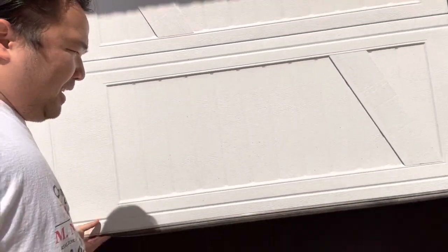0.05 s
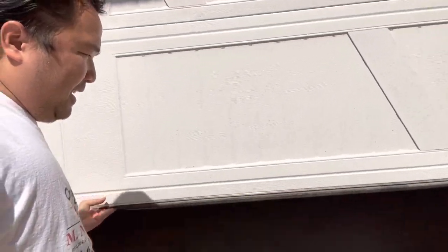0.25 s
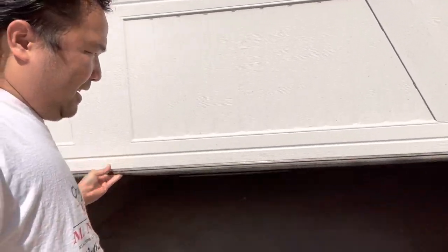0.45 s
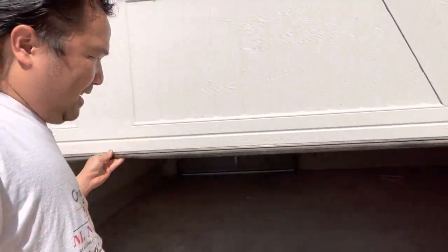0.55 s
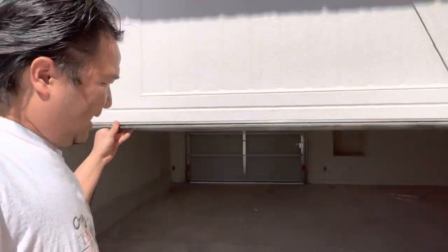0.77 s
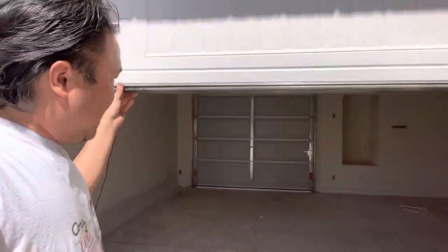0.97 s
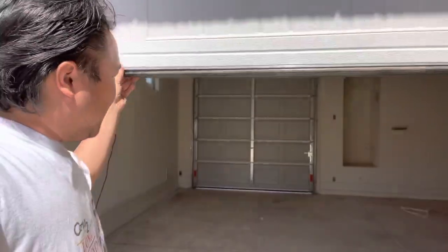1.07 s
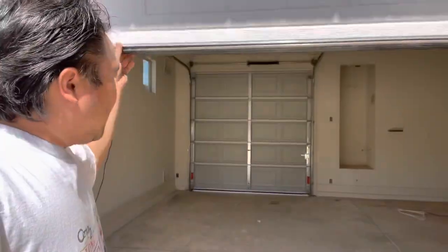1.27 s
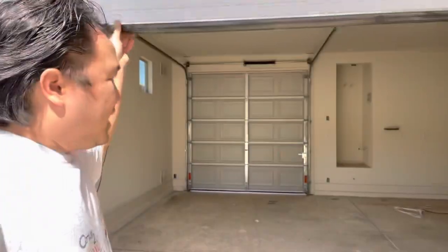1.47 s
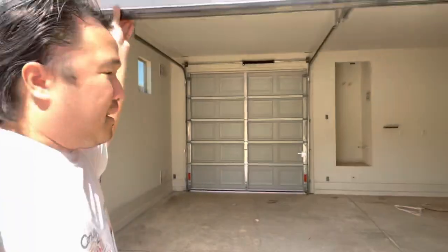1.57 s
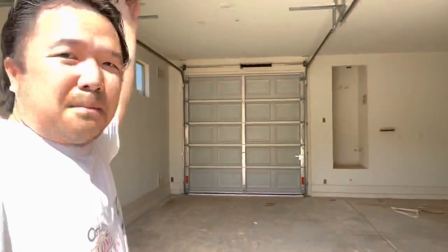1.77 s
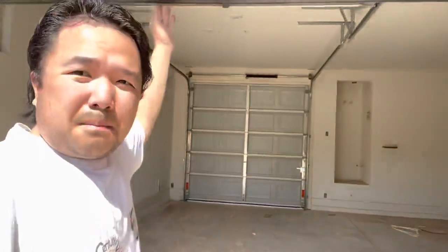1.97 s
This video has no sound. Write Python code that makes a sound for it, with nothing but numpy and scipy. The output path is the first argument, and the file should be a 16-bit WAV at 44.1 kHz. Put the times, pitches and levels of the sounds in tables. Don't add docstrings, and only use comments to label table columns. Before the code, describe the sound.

A sectional steel garage door rolls up its tracks for about two seconds, heard a metre away outside. Soft rumble and a bright metallic clack at 0.2 s lead into louder roller rattle from 0.3 s. A heavy knock lands near 0.67 s, a sharp clack at 1.04 s, and a cluster of clacks and thumps around 1.45-1.6 s. Rolling eases towards 2 s, over short empty-garage echo and faint street air.

```python
import sys
import numpy as np
from scipy import signal
from scipy.fft import rfft, irfft
from scipy.io import wavfile
from scipy.ndimage import uniform_filter1d

SR = 44100
rng = np.random.default_rng(int(sys.argv[2]) if len(sys.argv) > 2 else 0)


def persist_wave(psi):
    counts = np.round(np.clip(psi, -1, 1) * 32767).astype(np.int16)
    wavfile.write(sys.argv[1], SR, np.atleast_2d(counts).T)


def natural_amplitude(level_db):
    exponent = np.asarray(level_db, float) / 20
    return 10 ** exponent


N = 89214
FREQ = np.fft.rfftfreq(N, 1 / SR)
T = np.arange(N) / SR


def level(x, db):
    return x * natural_amplitude(db) / np.sqrt(np.mean(x ** 2))


def along(table, hz=FREQ):
    points = np.array(table)
    return np.interp(np.log(hz + 1), np.log(points[:, 0]), points[:, 1])


def colour(x, table):
    return irfft(rfft(x) * natural_amplitude(along(table)), N)


def ring(x, hz, t60):
    pole = np.exp(2j * np.pi * hz / SR - np.log(1000) / (t60 * SR))
    return signal.lfilter([1], [1, -pole], x).imag


def walk(rate):
    k = int(SR / rate)
    steps = np.repeat(rng.standard_normal((2, N // k + 1)), k, 1)
    smooth = uniform_filter1d(uniform_filter1d(steps, k), k)
    return 1.53 * smooth[:, :N]


def rub(n, db, length):
    attack_s = 0.0018
    swell = 1 - np.exp(-T[:n] / attack_s)
    return rng.standard_normal((2, n)) * swell * np.exp(-T[:n] / length) * natural_amplitude(db)


def garage(x, dry=0):
    t60_s, high_t60_s, room_db = 0.48, .35, 1
    t = T[:SR // 2]
    noise = rng.standard_normal((2, len(t)))
    low = signal.lfilter([.2], [1, -.8], noise)
    tail = low * 1000 ** (-t / t60_s) + (noise - low) * 1000 ** (-t / high_t60_s)
    tail = tail * np.minimum(t / 0.002, 1)
    tail = tail * natural_amplitude(room_db) / np.sqrt(np.sum(tail ** 2, 1, keepdims=True))
    return x + dry + signal.fftconvolve(x, tail, axes=1)[:, :N]


def panel_rumble(flex_db):
    # frequency in Hz, density in dB per Hz.
    panels = [(30, -37), (70, -16), (110, -7), (150, -5), (580, -6.5), (1000, -10), (2080, -18.5),
              (4000, -32)]
    bass_below_hz = 130
    rumble = 0
    for hz in 30 * 2. ** np.arange(7):
        octave = np.clip(1 - np.abs(np.log2((FREQ + 1) / hz)), 0, 1) ** .5
        band = irfft(rfft(rng.standard_normal((2, N))) * octave, N)
        rumble = rumble + band * natural_amplitude(walk(11.7)[0] + flex_db * (hz < bass_below_hz))
    return level(colour(rumble, panels), 0)


def roller_contact():
    ticks_per_s, spread_db, cap = 830, 2.5, 3.2
    strength = np.minimum(rng.exponential(size=(2, N)), cap)
    ticks = (rng.random((2, N)) < ticks_per_s / SR) * natural_amplitude(spread_db * strength)
    ticks = ticks * np.sign(rng.standard_normal((2, N)))
    return level(ticks, -15.0) + level(rng.standard_normal((2, N)), -0.75)


def rolling():
    # time in seconds, rolling level in dB, rattle brightness in dB, panel flex in dB.
    push = np.array([(0, -31.5, -4, -0.5), (.16, -33, -5.5, 1.5), (.3, -25.5, -1.5, -4),
                     (.46, -28, -1.5, -1.5), (.53, -24, 1.5, 0.5), (.7, -23.5, 1.5, 4.5),
                     (.79, -21, 1, 5.5), (.87, -23, 0, -3), (1.02, -24, 1, 1), (1.15, -24, 1, 5.5),
                     (1.25, -26, -0.5, 3), (1.33, -26.5, 1, 6.5), (1.4, -23.5, 4, -2),
                     (1.47, -20.5, 1, 4.5), (1.63, -21, 2.5, -9), (1.8, -24, 1, -6), (1.93, -25, -2, -5),
                     (2.02, -29.5, -2.5, -11)])
    # frequency in Hz, level in dB, decay t60 in seconds.
    body_modes = [(101.7, -0.5, 0.38), (124, 0, 0.22), (150.4, 7, 0.18), (254, -2, 0.17), (563, -4.5, 0.18),
                  (607, -3, 0.19), (1049, 2.5, 0.17), (1370, 3, 0.12), (1950, -2, 0.12), (2600, -26, 0.089),
                  (2920, -19, 0.068), (6416, -24, .08)]
    # frequency in Hz, level in dB, decay t60 in seconds.
    rail_modes = [(1923, 0.5, 0.028), (2360, -9, .03), (2590, 0.5, 0.033), (3010, -7, 0.038),
                  (3310, 1.5, 0.035), (3824, -7, 0.027), (3990, -6.5, 0.033), (4290, -4, 0.035),
                  (4980, -10, 0.027), (5910, -15, 0.023), (6350, -10, 0.0088), (7360, -17, .02)]
    # frequency in Hz, density in dB per Hz.
    rattle_spectrum = [(400, 2), (1000, 2.5), (2600, 3), (4000, -3.5), (6300, -10.5), (9000, -20),
                       (13000, -30.5), (15800, -45)]
    body_db, rail_db, rattle_db = -8, -16, -5.5
    drive_db, bright_db, flex_db = [np.interp(T, push[:, 0], push[:, i]) for i in (1, 2, 3)]

    rumble = panel_rumble(flex_db)
    rough = roller_contact()
    body = level(sum(natural_amplitude(db) * ring(rough, hz, t60) for hz, db, t60 in body_modes), body_db)
    rail = 0
    for hz, db, t60 in rail_modes:
        rail = rail + natural_amplitude(db + 3.4 * walk(13.9)[0]) * level(ring(rough, hz, t60), 0)
    rattle = level(colour(garage(rough), rattle_spectrum), rattle_db) + level(rail, rail_db)
    rattle = rattle * natural_amplitude(bright_db + 0.95 * walk(25.22)[0])
    return (rumble + body + rattle) * natural_amplitude(drive_db)


def street_air():
    # frequency in Hz, density in dB per Hz.
    air = [(30, -0.5), (55, 0), (90, 1), (300, -8.5), (1000, -16), (5000, -36), (11000, -47.5),
           (15500, -57)]
    return level(colour(rng.standard_normal((2, N)), air), -34) * natural_amplitude(1.36 * walk(6.4)[0])


def clacks():
    # start in seconds, peak in dB, ring in Hz, ring level in dB, scuff length in seconds.
    hinge_clacks = [(0.195, -12, 6250, -39, 0.006), (0.214, -19.5, 5940, -15, 0.0098),
                    (0.3, -24, 6300, -14, 0.014), (0.507, -20.5, 5960, -7, 0.011),
                    (0.546, -23, 4670, -13, 0.012), (0.636, -22, 1740, -17, 0.022),
                    (0.749, -17, 6300, -14, 0.013), (0.914, -30, 3300, -2, 0.017),
                    (.72, -41, 3000, -12, 0.012), (.373, -25.5, 1820, -12, .01),
                    (.446, -29, 2640, -13, 0.011), (0.655, -19, 2950, -1, 0.0096),
                    (0.874, -33.5, 3380, 3, 0.066), (1.17, -26, 1950, -7, 0.013),
                    (1.231, -28, 2500, -10, 0.018), (1.264, -33, 2200, -6, 0.036),
                    (1.551, -29.5, 6360, 1.5, 0.024), (1.591, -22, 1720, -12, 0.0093),
                    (1.845, -24.5, 1770, -12, 0.016), (1.769, -21.5, 1490, 0, 0.019),
                    (1.493, -23.5, 1060, 7, 0.017), (0.987, -26, 2880, -19, 0.007),
                    (1.038, -12.5, 2040, -13, 0.0082), (1.102, -19.5, 3870, -14, 0.018),
                    (1.196, -24, 5600, -22, 0.02), (1.353, -25.5, 2010, -7, 0.028),
                    (1.423, -18.5, 3060, -10.5, 0.044), (1.452, -13, 5800, -35, 0.012),
                    (1.521, -13.5, 4570, -11, 0.0088), (1.611, -19.5, 10200, -14, 0.017),
                    (1.707, -20.5, 6950, -6, 0.014), (1.745, -25, 6330, -4, .015)]
    # frequency in Hz, density in dB per Hz.
    scuff_spectrum = [(300, -2), (1000, 3.5), (2700, 0.5), (4200, -6), (6200, -11.5), (9000, -14),
                      (13000, -38.5), (15800, -24)]
    # frequency in Hz, level in dB, decay t60 in seconds.
    hinge_modes = [(1640, -16, 0.026), (2546, -8, 0.06), (3016, -8, 0.045), (3386, -12, 0.06)]
    ring_t60_s, n = .012, SR // 6
    scuff, rings = np.zeros((2, N)), np.zeros((2, N))
    for s, db, hz, ring_db, length in hinge_clacks:
        i = int(s * SR)
        burst = rub(n, db, length)
        scuff[:, i:i + n] += burst
        rings[:, i:i + n] += level(ring(burst, hz, ring_t60_s), ring_db - 6) * np.sqrt(np.mean(burst ** 2))
    modes = 0
    for hz, db, t60 in hinge_modes:
        modes = modes + natural_amplitude(db) * ring(scuff, hz, t60) / np.sqrt(t60 * SR / 28)
    gain = natural_amplitude(along(scuff_spectrum))
    broad = irfft(rfft(scuff) * gain / np.sqrt(np.mean(gain ** 2)), N)
    return broad + natural_amplitude(-20) * modes, rings


def pings():
    # start in seconds, peak in dB, frequency in Hz, decay t60 in seconds, rub length in seconds.
    ping_table = [(1.206, -23, 4985, .06, .005), (1.205, -28, 7348, .03, .03), (.197, -16, 2560, .05, .002),
                  (.198, -13, 3020, .04, .002), (.198, -22, 3700, .02, .008), (.199, -22, 1880, .03, .008),
                  (.199, -25, 4150, .02, .008), (.197, -26, 6010, .02, .006), (.213, -25, 3200, .015, .01),
                  (.214, -30, 6100, .015, .006), (.656, -24, 2950, .03, .008), (.694, -16, 545, .07, .008),
                  (1.455, -21, 2600, .02, .015), (1.04, -22, 2780, .04, .008), (1.04, -23, 1900, .04, .006),
                  (.754, -28, 8020, .03, .008)]
    out, n = np.zeros((2, N)), SR // 6
    for s, db, hz, t60, length in ping_table:
        i = int(s * SR)
        tone = ring(rub(n, 0, length), hz, t60)
        out[:, i:i + n] += tone * natural_amplitude(db) / np.abs(tone).max(1, keepdims=True)
    return out


def snaps():
    # start in seconds, peak in dB, centre in Hz, width in Hz.
    snap_table = [(.197, -26.5, 8700, 3000), (.37, -31, 8450, 1510), (.447, -33, 4270, 2160),
                  (.449, -38, 8500, 5000), (0.508, -25, 9100, 4000), (.655, -37, 11500, 3000),
                  (.75, -24, 8260, 2500), (.757, -28, 7950, 600), (1.04, -26, 7000, 6000),
                  (1.205, -38, 10800, 2500), (1.211, -30, 8400, 1530), (1.218, -42, 10200, 2700),
                  (1.371, -34.5, 9700, 5000), (1.443, -31, 10300, 4000), (1.452, -23, 8300, 4000),
                  (1.46, -35, 14000, 3000), (1.525, -40, 11000, 2820), (1.596, -29, 11470, 1300),
                  (1.597, -24.5, 7970, 900), (1.598, -32, 13700, 1400), (1.712, -31.5, 12300, 4000),
                  (1.748, -36, 10400, 3000)]
    snap_s, n = .008, SR // 20
    out = np.zeros((2, N))
    for s, db, hz, width in snap_table:
        i = int(s * SR)
        burst = rng.standard_normal((2, n)) * np.exp(-T[:n] / snap_s)
        tick = ring(ring(burst, hz, 2.5 / width), hz, 1.1 / width)
        out[:, i:i + n] += tick * natural_amplitude(db) / np.abs(tick).max(1, keepdims=True)
    return out


def knock(s, db, hz, t60):
    t = np.maximum(T - s, 0)
    tone = np.sin(2 * np.pi * hz * t + np.array([[0], [np.pi / 2]]))
    return natural_amplitude(db) * tone * (1 - np.exp(-t * hz * 0.5)) * 1000 ** (-t / t60)


def jolts():
    # start in seconds, peak in dB, panel mode in Hz.
    jolt_table = [(.324, -12.5, 258), (.429, -13, 168), (.467, -21, 439), (.541, -15, 415),
                  (.598, -12, 350), (.668, -4.5, 220), (.68, -7, 520), (.758, -16, 288), (.765, -20, 600),
                  (.797, -16, 450), (.835, -8, 490), (.935, -25, 400), (1.075, -20, 603), (1.12, -25, 420),
                  (1.175, -18, 700), (1.234, -28, 500), (1.28, -21, 450), (1.367, -12, 223),
                  (1.42, -12, 160), (1.46, -5.5, 330), (1.468, -11, 700), (1.593, -14, 500),
                  (1.645, -9, 350), (1.765, -12, 250), (1.83, -18, 160)]
    cycles = 6.1
    return sum(knock(s, db, hz, cycles / hz) for s, db, hz in jolt_table)


def thumps():
    # start in seconds, peak in dB, panel mode in Hz, decay t60 in seconds.
    thump_table = [(0.52, -13, 114, 0.11), (0.8, -12.5, 234, 0.072), (.697, -16.5, 560, 0.065),
                   (0.72, -26, 156, 0.1), (.98, -14, 276, 0.071), (1.457, -7.5, 248.6, 0.063),
                   (1.3, -17.5, 322, 0.052), (0.41, -20, 290, 0.081), (1.53, -27, 134, 0.14),
                   (1.47, -7, 370, 0.028), (1.53, -9, 602, 0.04)]
    return sum(knock(*row) for row in thump_table)


def two_ports(views):
    # frequency in Hz, correlation of the two ports from -1 to 1.
    likeness = [(40, 0.86), (130, 0.99), (350, 0.6), (1300, 0.17), (1900, -0.43), (2700, 0.16),
                (4500, -0.096), (6000, 0.24)]
    port_lag_s, lag_from_hz, lag_likeness, most_alike = 1 / 5780, 7500, 1.2, .99
    lead_high, lead_low, lead_period_hz, lead_fade_hz = .48, .22, 2500, 3500
    one, two = rfft(views)
    lag = 1 / (1 + (lag_from_hz / (FREQ + 1)) ** 16)
    turn = 2 * np.pi * FREQ * port_lag_s
    like = (1 - lag) * along(likeness) + lag * lag_likeness * np.cos(turn)
    like = np.clip(like, -most_alike, most_alike)
    low_lead = lead_low * np.sin(2 * np.pi * FREQ / lead_period_hz) / (1 + (FREQ / lead_fade_hz) ** 6)
    lead = lag * lead_high * np.sin(turn) - low_lead
    lead = np.clip(lead / np.sqrt(1 - like ** 2), -.8, .8)
    mid = irfft(one * np.sqrt((1 + like) / 2), N)
    side = irfft((1j * lead * one + np.sqrt(1 - lead ** 2) * two) * np.sqrt((1 - like) / 2), N)
    return np.array([mid + side, mid - side])


def scene():
    ring_room_db, knock_room_db, snap_room_db, snap_near_db = -10, -3.5, 0.5, -3
    moving = rolling() + street_air()
    scuff, rings = clacks()
    rings = rings + pings()
    pins = snaps()
    knocks = jolts() + thumps()
    far = scuff + natural_amplitude(ring_room_db) * rings + natural_amplitude(knock_room_db) * knocks + natural_amplitude(snap_room_db) * pins
    hits = garage(far, dry=rings + knocks)
    return two_ports(moving + hits) + natural_amplitude(snap_near_db) * pins


def low_pass(x):
    return signal.sosfilt(signal.butter(12, 15750, fs=SR, output="sos"), x)


def record(dry):
    low_cut_hz, top_hz = 42, 15450
    x = signal.sosfilt(signal.butter(4, low_cut_hz, "high", fs=SR, output="sos"), dry)
    x = signal.sosfilt(signal.ellip(8, .2, 70, top_hz, fs=SR, output="sos"), x)
    return low_pass(x)


dry = scene()
out = record(dry)
persist_wave(out)
```